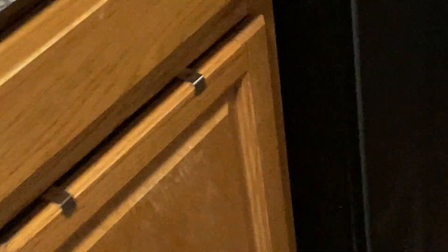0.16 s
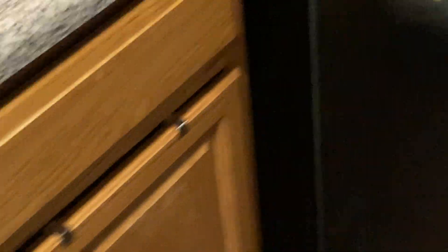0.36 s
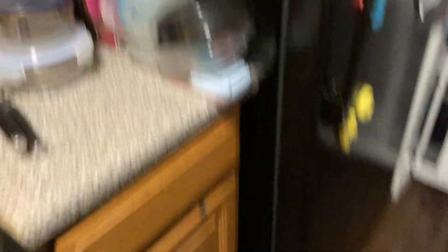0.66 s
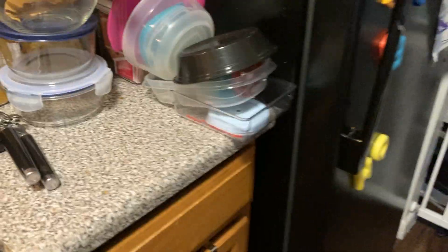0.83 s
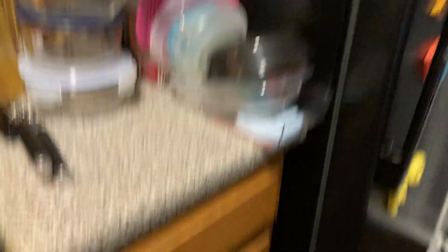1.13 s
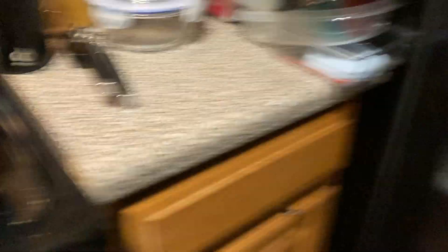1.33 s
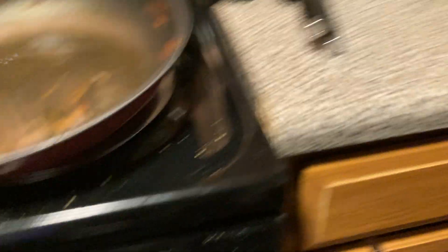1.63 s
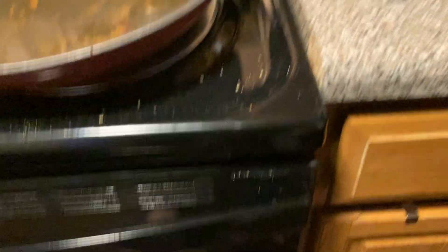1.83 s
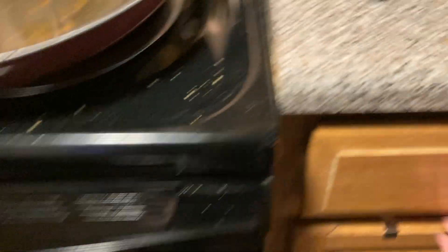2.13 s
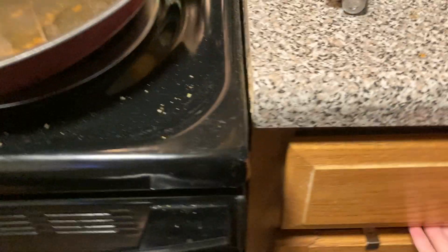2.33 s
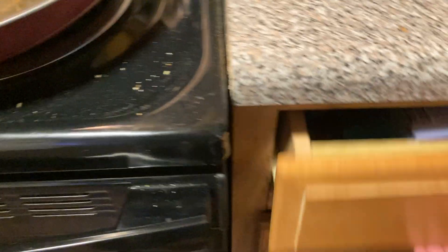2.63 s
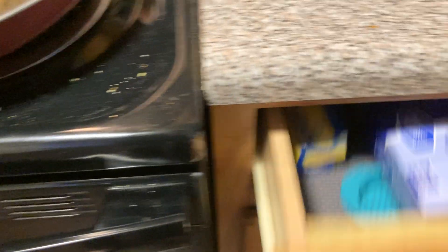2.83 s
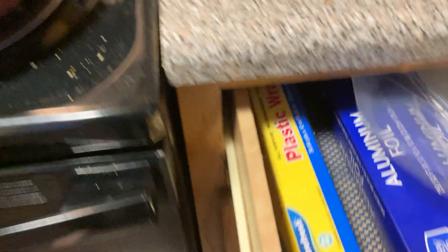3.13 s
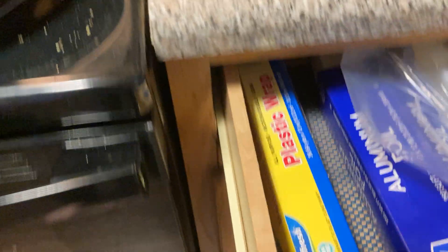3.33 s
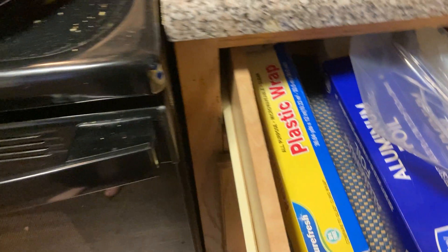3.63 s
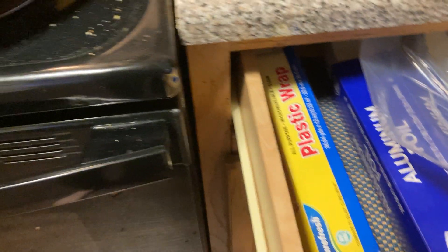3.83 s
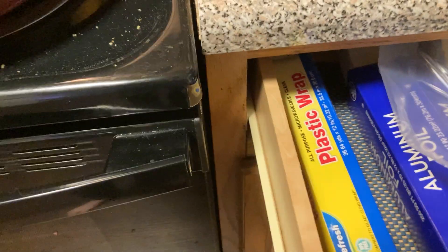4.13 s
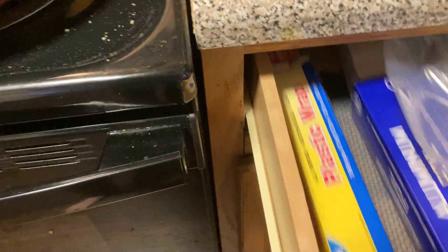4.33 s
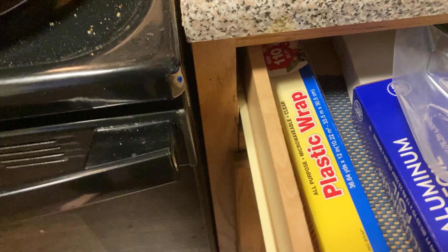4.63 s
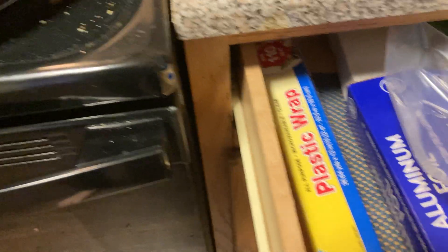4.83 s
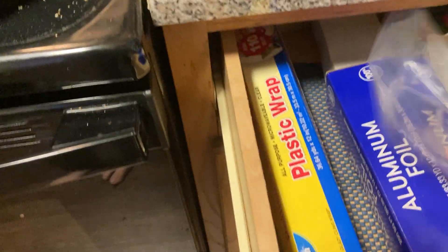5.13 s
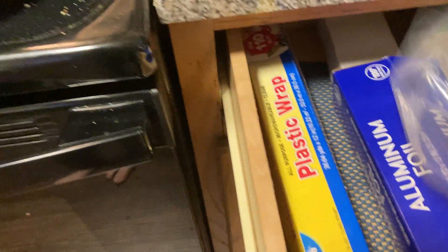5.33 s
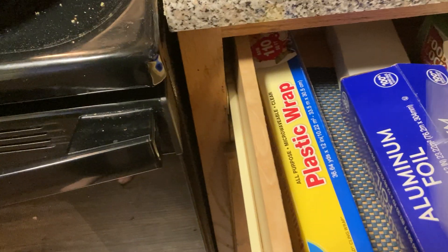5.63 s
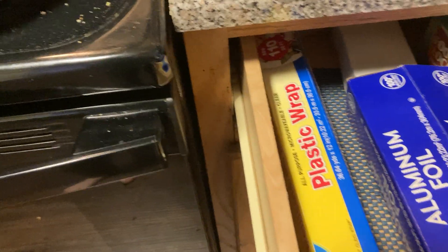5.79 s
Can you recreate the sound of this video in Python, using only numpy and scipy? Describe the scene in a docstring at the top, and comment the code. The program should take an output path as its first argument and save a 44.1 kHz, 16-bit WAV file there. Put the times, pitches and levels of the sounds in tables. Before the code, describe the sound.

Dull handling bumps and soft knocks on a cabinet come first, heard up close on a moving microphone. Next a wooden drawer rattles and scrapes out, a little to one side. The loudest sound follows, a carton landing in the drawer with a deep thud and a brief skid. A plastic bag crinkles sharply to the end, over faint kitchen room tone.

```python
"""A quiet kitchen, heard from a hand-held phone. Fingers bump the case, a cabinet door is knocked, a wooden
drawer scrapes out and stops, a carton drops onto its floor and a plastic bag crackles as it is pulled
away. Knocks and stick-slip friction ring the same woodwork; the bag's creases snap and boom.
The phone delays the bass of each click, so bumps sweep downwards."""
import sys
import numpy as np
from scipy import signal
from scipy.fft import rfft, irfft, next_fast_len
from scipy.io import wavfile
from scipy.ndimage import uniform_filter1d

SR = 44100
rng = np.random.default_rng(int(sys.argv[2]) if len(sys.argv) > 2 else 0)


def persist_wave(psi):
    """Save psi, clipped to +-1, as 16-bit WAV."""
    counts = np.round(np.clip(psi, -1, 1) * 32767).astype(np.int16)
    wavfile.write(sys.argv[1], SR, np.atleast_2d(counts).T)


N = 262836
T = np.arange(N) / SR
SIZE = next_fast_len(N + SR)
HZ = np.maximum(np.arange(SIZE // 2 + 1) * SR / SIZE, 1)

# tone of the room, the grip and the sleeve: freq_hz, density_db
AIR_TONE = [(18, -48), (30, -2.5), (66, -0.5), (333, -7), (596, -16), (1270, -18.5), (2730, -35.5),
            (7140, -40), (8310, -42), (9190, -55.5), (10700, -39.5), (12800, -47.5), (16600, -84)]
RUMBLE_TONE = [(15, -28), (55, -1), (100, -14), (200, -28.5), (350, -27)]
SWISH_TONE = [(150, 7), (400, 7), (1000, 1), (2000, -12.5), (3500, -37.5)]
# tone of the bag's film, its hollow pouch and the grit on the wood: freq_hz, density_db
FILM_TONE = [(500, 4.5), (1970, 11), (2900, -6), (4500, -3), (7000, -7), (10000, -27), (14000, -52)]
POUCH_TONE = [(80, -10), (230, 7.5), (400, 6.5), (700, 0.5), (1500, -10), (2500, -51)]
GRIT_TONE = [(500, -12), (1200, 14), (2100, -1.5), (3000, -19.5), (4700, -9.5), (6700, -11), (8500, -27.5),
             (9600, -38.5), (13000, -59)]
# modes of the panels, the cabinet carcass and the rocking drawer: pitch_hz, gain_db
WOOD_MODES = [(281, 1), (355, 7), (420, 0), (448, 5), (540, 4), (590, -3), (681, -1), (767, -5), (890, 2),
              (982, -2), (1132, -8), (1354, -10), (1436, -12), (1660, -14), (1910, -16), (2050, -15),
              (2280, -13)]
CARCASS_MODES = [(55, -15), (81, 1), (120, 4), (160, -14)]
SWAY_MODES = [(165, -10), (213, 4.5), (252, 3.5), (281, 2)]
# hand and sleeve on the phone: time_s, rumble_db, swish_db
HANDLING_LEVELS = [(0.0, -67, -68), (0.24, -51.5, -61.5), (0.37, -70, -60.5), (0.43, -88, -112),
                   (0.9, -61, -72.5), (1.2, -66, -90), (1.3, -40, -64), (1.36, -43, -44.5),
                   (1.42, -43.5, -61), (1.5, -49.5, -71), (1.68, -73, -68.5), (2.3, -69.5, -71.5),
                   (2.58, -52, -57.5), (3.4, -59, -66), (3.7, -47, -66), (3.95, -63, -74), (4.3, -48, -59),
                   (4.95, -62, -65), (5.5, -50, -56.5), (5.96, -53, -59)]
# fingers on the case: start_s, peak_db, time_constant_ms
CASE_BUMPS = [(0.15, -39, 0.23), (0.699, -42, 0.17), (0.994, -23.5, 0.27), (1.254, -20.5, 1.72),
              (1.332, -10, 0.97), (1.899, -41.5, 0.26), (2.097, -39, 0.76), (2.424, -42, 0.83),
              (2.693, -21.5, 0.81), (3.844, -36.5, 0.8), (4.039, -37, 1.02)]
# small dry ticks: start_s, peak_db, pitch_hz
DRY_TICKS = [(0.628, -52, 1310), (1.386, -51.5, 2230), (1.9417, -49, 1510), (1.9967, -49, 2200),
             (2.0506, -44.5, 1520), (2.866, -40, 3270), (3.516, -47.5, 1190), (3.581, -54, 1510),
             (3.61, -43, 1050), (3.645, -49, 1230), (3.679, -54, 1260), (3.714, -49, 990),
             (3.999, -51, 1250), (4.119, -54.5, 1340), (4.316, -53, 2780)]
# the bag dragged out: time_s, pouch_db, hiss_db
BAG_LEVELS = [(5.03, -38.5, -53.5), (5.07, -43.5, -58), (5.3, -51.5, -57.5), (5.44, -44, -55.5),
              (5.6, -50, -50), (5.7, -49, -46.5), (5.96, -50.5, -60.5)]
# its loud creases: start_s, snap_peak_db, boom_peak_db, boom_hz
BAG_CREASES = [(5.042, -26.5, -34, 232), (5.0979, -30.5, -21, 398), (5.1227, -24, -33.5, 360),
               (5.207, -34, -38, 400), (5.2385, -26.5, -35.5, 250), (5.2665, -21, -31, 264),
               (5.288, -51, -25.5, 396), (5.3552, -28.5, -59, 463), (5.41, -25.5, -26, 430),
               (5.4799, -28.5, -50, 373), (5.517, -27, -53, 228), (5.547, -28, -27, 374),
               (5.5639, -23, -21, 621), (5.599, -26, -24.5, 280), (5.6677, -27.5, -27.5, 760),
               (5.714, -25, -40, 338), (5.7507, -25, -31.5, 295), (5.7876, -25.5, -31, 370),
               (5.8565, -30, -54, 232), (5.8737, -20.5, -25.5, 233), (5.933, -22, -24.5, 567)]
# narrow friction hisses: start_s, end_s, centre_hz, half_width_hz, level_db
SQUEAKS = [(1.83, 2.2, 3300, 400, -82), (2.15, 2.25, 4300, 1500, -74), (3.72, 3.775, 2400, 120, -72),
           (1.47, 1.56, 950, 120, -62), (1.47, 1.58, 1900, 150, -68), (4.4, 4.425, 4700, 250, -46),
           (4.4, 4.425, 6700, 200, -41), (4.435, 4.443, 6300, 600, -38), (5.63, 5.73, 3700, 1400, -54)]
# the drawer sliding out: time_s, wood_db, bass_db, grit_db
SLIDE_LEVELS = [(2.65, -58.5, -46, -75.5), (2.69, -38, -47.5, -47), (2.77, -41.5, -48, -65.5),
                (2.84, -39, -36.5, -48), (2.93, -44, -54.5, -51), (3.06, -44, -50.5, -62.5),
                (3.14, -52.5, -39.5, -69.5), (3.22, -54.5, -59, -67), (3.37, -87, -46, -71)]
# the carton landing, rows for wood, bass, grit: peak_db, fall_db_per_s, linger_db, linger_db_per_s
LANDING_DECAYS = [(-24, 380, -38.5, 79), (-23.5, 394, -40.5, 39), (-23, 392, -36, 164)]
# the carton's weight: start_s, carcass_peak_db, floor_peak_db
CARTON_THUDS = [(4.388, -10, -18.5), (4.408, -9.5, -14), (4.433, -25, -28), (4.485, -26.5, -42)]
# blows on wood and carton: start_s, peak_db, lowest_strong_hz, crack_over_peak_db
WOOD_BLOWS = [(0.412, -44.5, 636, -30), (1.246, -38.5, 792, -9), (1.329, -31, 544, -9.5),
              (1.354, -28, 530, -15), (1.362, -27.5, 540, -26), (1.369, -36, 478, -41),
              (1.493, -42.5, 228, -61), (2.153, -35.5, 820, 6.5), (2.172, -40.5, 890, 3),
              (2.33, -46, 276, -43), (2.537, -43, 497, 3.5), (2.675, -33.5, 900, 6),
              (2.691, -28.5, 450, -18), (2.798, -37, 990, -3), (2.822, -25.5, 1300, -3.5),
              (2.839, -28.5, 423, 0), (2.863, -28, 1220, -9), (3.034, -25.5, 885, -1.5),
              (3.075, -47.5, 1390, 12.5), (3.216, -33, 1280, -16), (3.245, -36, 880, -22),
              (3.261, -22.5, 475, 1.5), (3.761, -46, 523, -36), (4.151, -42.5, 277, -35.5),
              (4.3, -34.5, 406, -17), (4.381, -15.5, 345, -3), (4.392, -10.5, 780, -8.5),
              (4.404, -17, 680, -7), (4.413, -13.5, 880, -2.5), (4.459, -19.5, 568, -18),
              (4.528, -37, 410, -16), (4.609, -30.5, 613, -30), (4.682, -36.5, 275, -38)]
# the stereo image opening into the bass: time_s, mono_below_hz
MONO_EDGE = [(0, 720), (1.3, 573), (2.75, 119), (5.96, 64)]

DOOR_UNTIL_S = 1.7  # the early knocks come from the door straight ahead
LAND_S, LAND_ATTACK_S = 4.42, 0.048  # crest and rise of the carton's skid
CARCASS_T60_S = 0.15


def undb(db):
    return 10 ** (np.asarray(db) / 20)


def unit(x):
    return x / np.sqrt(np.mean(x ** 2))


def shape(x, response):
    """Filter by a frequency response."""
    return irfft(rfft(x, SIZE) * response, SIZE)[..., :N]


def colour(x, points):
    """EQ x through (freq_hz, gain_db) points; rms 1."""
    hz, db = np.transpose(points)
    return unit(shape(x, undb(np.interp(np.log(HZ), np.log(hz), db, -90, -90))))


def wide(points, mono_hz):
    """Stereo noise, centred below mono_hz and diffuse above."""
    mid, side = rng.standard_normal((2, N))
    side = shape(side, 1 / np.sqrt(1 + (mono_hz / HZ) ** 3))
    return colour(np.array([mid + side, mid - side]), points)


def faders(table):
    """A smooth dB curve for each level column, silent outside the table."""
    s, *levels = np.transpose(table)
    return [uniform_filter1d(np.interp(T, s, db, -140, -140), size=512) for db in levels]


def flutter(rate_hz):
    """Glides between random levels; spread near 1."""
    hold = int(SR / rate_hz)
    return uniform_filter1d(np.repeat(rng.standard_normal(N // hold + 1), hold), hold)[:N]


def grains(per_s, spread_db):
    """Random slips of very uneven size."""
    when, sign, size = rng.random((3, N))
    return (when < per_s / SR) * np.sign(sign - .5) * undb(-spread_db * np.log(1 - size))


def rings(modes, t60_s):
    """One decaying sine a row."""
    hz, db = np.array(modes).T[:, :, None]
    t = T[:8192]
    return undb(db) * np.sin(2 * np.pi * hz * t) * 1000. ** (-t / t60_s)


def resonate(force, modes, t60_s):
    """A force shakes all the modes."""
    return signal.fftconvolve(force, rings(modes, t60_s).sum(axis=0))[:N]


def wood_decays(t60_at_500_hz_s):
    """Ring time of each panel mode: the higher ones die sooner."""
    return t60_at_500_hz_s * (500 / np.array(WOOD_MODES)[:, :1]) ** 0.45


def add(track, start_s, sound, peak_db):
    """Drop a one-shot onto the track."""
    i = int(start_s * SR)
    track[i:i + len(sound)] += (sound * undb(peak_db) / np.abs(sound).max())[:N - i]


def crack(points, rise_ms):
    """A short burst of coloured noise, each with its own tint."""
    t, hz = T[:2048], HZ[::SIZE // 2048][:1025]
    at_hz, db = np.transpose(points)
    tinted_db = db + 3.5 * rng.standard_normal(len(db))
    tone = undb(np.interp(np.log(hz), np.log(at_hz), tinted_db, -90, -90))
    return irfft(rfft(rng.standard_normal(2048)) * tone) * t ** 2 * np.exp(-2000 * t / rise_ms)


def room_tone():
    """A faint, dark bed of air that wavers gently."""
    return undb(-62.5 + 1.8 * flutter(4.4)) * wide(AIR_TONE, mono_hz=210)


def in_kitchen(x, lag_ms, room_db, low_t60_s=0.13, high_t60_s=0.15):
    """Place a source: the phone's left port hears it later and duller, and the room adds a short tail."""
    turn = np.exp(-1j * np.pi * HZ * lag_ms / 1000 / (1 + (HZ / 4800) ** 6))  # no lag in the high treble
    shade = undb(-3 * HZ / 6000)
    t = T[:SR // 2]
    low = wide([(40, 1.0), (2500, 7.0), (3000, -12.5)], 890)[:, :len(t)] * 1000. ** (-t / low_t60_s)
    high = wide([(2000, -48.0), (2500, -0.5), (13000, -26.0)], 900)[:, :len(t)]
    tail = low + 1.42 * high * 1000. ** (-t / high_t60_s)
    tail = tail * np.clip(t / 0.00011, 0, 1) / np.sqrt(np.sum(tail ** 2) / 2)
    return shape(x, np.array([turn * shade, 1 / turn]) + undb(room_db) * rfft(tail, SIZE))


def handling():
    """Rumble of the grip and swish of cloth, both fluttering."""
    rumble_db, swish_db = faders(HANDLING_LEVELS)
    rumble = undb(rumble_db + 2.5 * flutter(12)) * colour(rng.standard_normal(N), RUMBLE_TONE)
    return rumble + undb(swish_db + 6.1 * flutter(35)) * wide(SWISH_TONE, mono_hz=750)


def bumps():
    """A finger's push on the case: a lone smooth pulse, duller the longer it lasts."""
    out = np.zeros(N)
    for s, db, ms in CASE_BUMPS:
        age = 1000 * T[:4096] / ms
        add(out, s, age ** 3 * np.exp(-age), db)
    return out


def ticks():
    """Tiny stiff snaps close to the phone."""
    out = np.zeros(N)
    for s, db, hz in DRY_TICKS:
        add(out, s, rings([(hz, 0), (1.34 * hz, -5)], t60_s=0.01).sum(axis=0), db)
    return out


def squeaks():
    """Narrow bands of friction noise that swell and fade."""
    out = np.zeros(N)
    for start_s, end_s, hz, half_width_hz, db in SQUEAKS:
        band = unit(shape(rng.standard_normal(N), 1 / (1 + ((HZ - hz) / half_width_hz) ** 4)))
        swell = np.sin(np.pi * np.clip((T - start_s) / (end_s - start_s), 0, 1))
        out += undb(db) * band * swell
    return out


def bag():
    """Creases snap and make the pouch boom; countless small ones crackle between."""
    pouch_db, hiss_db = faders(BAG_LEVELS)
    out = undb(pouch_db + 4 * flutter(30)) * colour(grains(900, 2.5), POUCH_TONE)
    out += undb(hiss_db + 4 * flutter(25)) * colour(grains(1500, 3.4), FILM_TONE)
    for s, snap_db, boom_db, hz in BAG_CREASES:
        tilt_db_per_octave = 0.64 * (snap_db + 24.5)  # a harder snap is brighter
        tone = [(f, db + tilt_db_per_octave * np.log2(f / 3000)) for f, db in FILM_TONE]
        add(out, s, crack(tone, rise_ms=1.0), snap_db)
        add(out, s, rings([(hz, 0), (1.47 * hz, -5)], t60_s=0.039).sum(axis=0), boom_db)
    return out


def sway(wood, relative_db=-4.5):
    """Whatever shakes the wood rocks the drawer sideways, pushing on one port and pulling on the other."""
    rock = resonate(np.abs(wood) * rng.standard_normal(N), SWAY_MODES, t60_s=0.2)
    return undb(relative_db) * np.std(wood) * unit(rock) * np.array([[1], [-1]])


def landing(peak_db, fall_db_per_s, linger_db, linger_db_per_s):
    """The carton's skid in dB: a swell, a steep fall, a slower tail."""
    after_s = T - LAND_S
    rise = peak_db + 24 * np.log10(np.clip(1 + after_s / LAND_ATTACK_S, 1e-4, 1))
    fall = np.maximum(peak_db - fall_db_per_s * after_s, linger_db - linger_db_per_s * after_s)
    return np.where(after_s < 0, rise, fall)


def rubbing(runner_hz=480, runner_db=2):
    """Drawer and carton stick and slip, ringing panels and carcass; the finest grit is heard bare."""
    slips = undb(4 * flutter(30)) * grains(900, 3.2)
    wood = unit(resonate(slips, WOOD_MODES, wood_decays(0.075)))
    runner_eq = undb(runner_db * np.exp(-(np.log2(HZ / runner_hz) / 0.35) ** 2))
    scrape = unit(shape(wood, runner_eq))
    bass = unit(resonate(grains(200, 4.5), CARCASS_MODES, CARCASS_T60_S))
    grit = undb(3 * flutter(70)) * colour(grains(1800, 2.2), GRIT_TONE)
    drawer = sum(undb(db) * x for db, x in zip(faders(SLIDE_LEVELS), (scrape, bass, grit)))
    carton = sum(undb(landing(*row)) * x for row, x in zip(LANDING_DECAYS, (wood, bass, grit)))
    return drawer + carton


def thuds():
    """The carton's heavy, soft blows ring only the lowest modes, dead centre."""
    out = np.zeros(N)
    carcass = rings(CARCASS_MODES, CARCASS_T60_S).sum(axis=0)
    floor = np.convolve(rings(WOOD_MODES[:4], t60_s=0.13).sum(axis=0), np.hanning(48))
    for s, carcass_db, floor_db in CARTON_THUDS:
        add(out, s, carcass, carcass_db)
        add(out, s, floor, floor_db)
    return out


def blows(reach_hz=3230, octaves_below=0.048, scatter_db=3):
    """Each blow chatters for a few ms into the wood modes from its pitch upwards, with a crack on top."""
    out, mode_hz = np.zeros(N), np.array(WOOD_MODES)[:, 0]
    panel = rings(WOOD_MODES, wood_decays(0.056))
    panel *= np.minimum(T[:panel.shape[1]] / 0.00043, 1)  # wood yields, so the ring starts softly
    for s, db, pitch_hz, crack_db in WOOD_BLOWS:
        softness = np.clip(crack_db / -58, 0, 1)  # a weak crack: fewer modes, longer chatter
        reach = 0.12 if s < DOOR_UNTIL_S else 0.55  # the hollow door rings closer to its pitch
        octaves_above = (1 - softness) ** 2 * reach * np.log2(reach_hz / pitch_hz)
        octaves = np.log2(mode_hz / pitch_hz)
        width = np.where(octaves < 0, octaves_below, max(octaves_above, .1))
        gains = np.exp(-.5 * (octaves / width) ** 2) * undb(scatter_db * rng.standard_normal(len(panel)))
        chatter_ms = 1.0 + 2.7 * softness
        age = 1000 * T[:1024] / chatter_ms
        chatter = rng.standard_normal(1024) * age * np.exp(-age)
        add(out, s, signal.fftconvolve(gains @ panel, chatter), db)
        add(out, s, crack(GRIT_TONE, rise_ms=1.99), db + crack_db)
    return out


def scene():
    """The mix: door ahead, drawer and bag off to one side, hand noise up close."""
    air = room_tone()
    wood = blows() + rubbing()
    door = wood * (T < DOOR_UNTIL_S)
    ahead = in_kitchen(door + ticks(), lag_ms=0.05, room_db=-14)
    aside = in_kitchen(wood - door + squeaks() + bag(), lag_ms=0.33, room_db=-13)
    return ahead + aside + sway(wood) + thuds() + bumps() + handling() + air


def mono_bass(pair):
    """Fold the image to mono below a falling crossover."""
    mid, side = pair.mean(axis=0), (pair[0] - pair[1]) / 2
    hz, s, frames = signal.stft(side, SR, nperseg=2048)
    edge_hz = np.interp(s, *np.transpose(MONO_EDGE))
    side = signal.istft(frames / (1 + (edge_hz / (hz[:, None] + 1)) ** 12), SR)[1][:N]
    return np.array([mid + side, mid - side])


def record(dry, low_cut_hz=42, top_hz=12936):
    """The phone centres the bass, holds each tone back by about a cycle and trims the sub and the top."""
    delay = np.exp(-2j * np.pi * 1.205 * np.log(1 + HZ / 15))
    low_cut = 1 / np.sqrt(1 + (low_cut_hz / HZ) ** 4)
    high_cut = signal.ellip(8, .2, 70, top_hz, fs=SR, output="sos")
    return signal.sosfilt(high_cut, shape(mono_bass(dry), delay * low_cut))


dry = scene()
out = record(dry)
persist_wave(out)
```